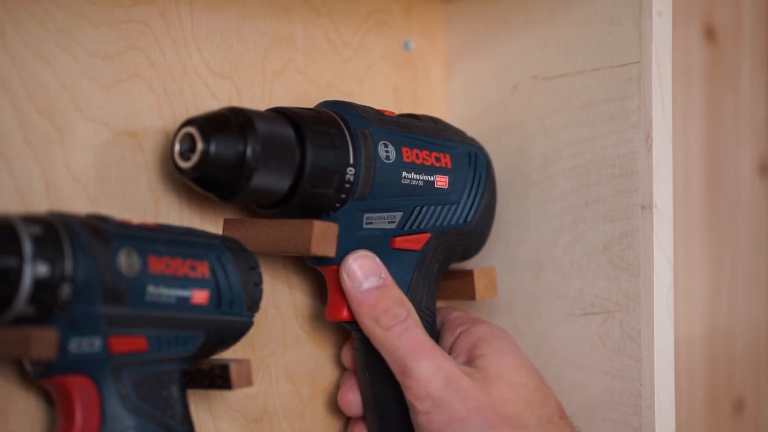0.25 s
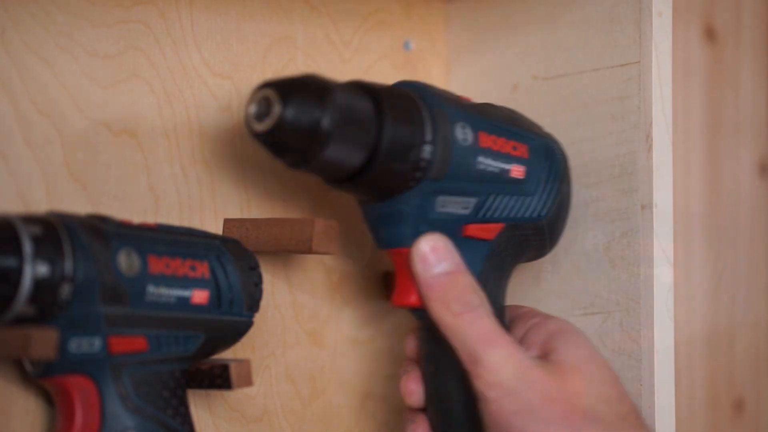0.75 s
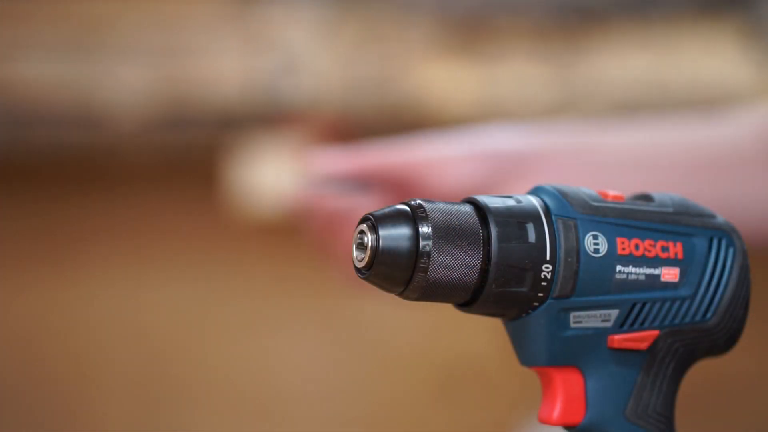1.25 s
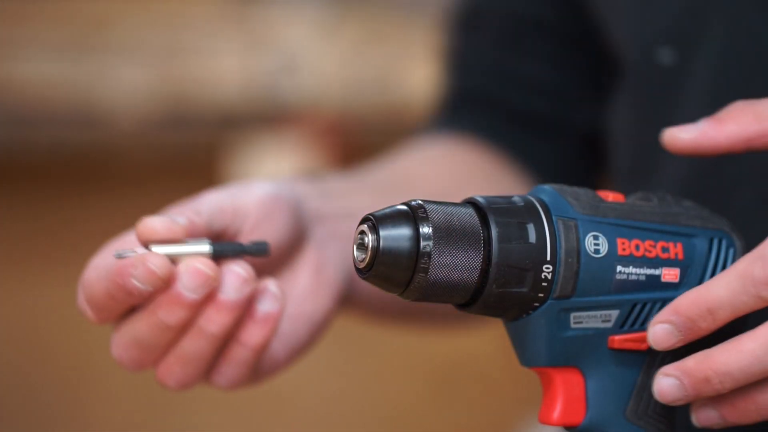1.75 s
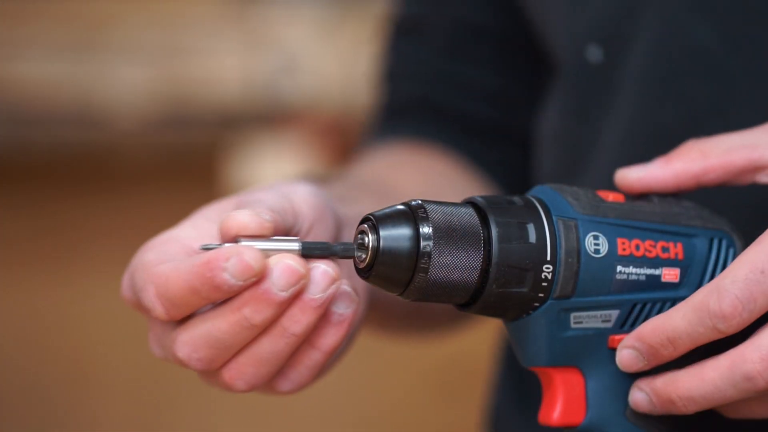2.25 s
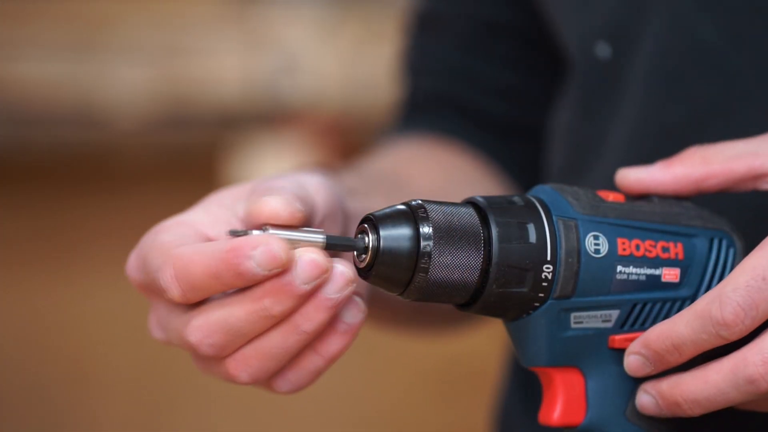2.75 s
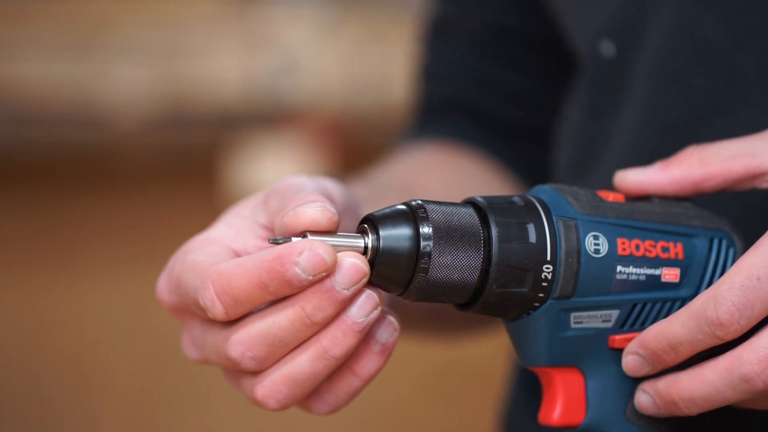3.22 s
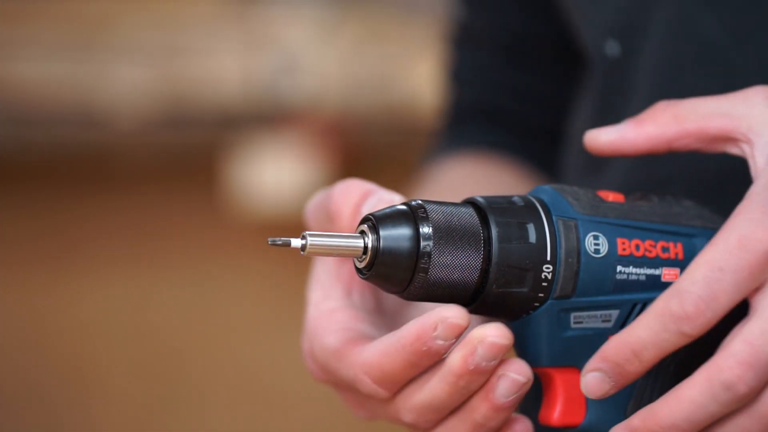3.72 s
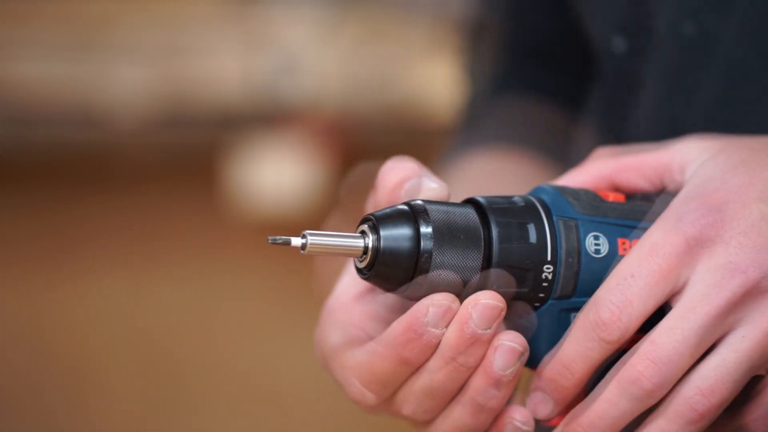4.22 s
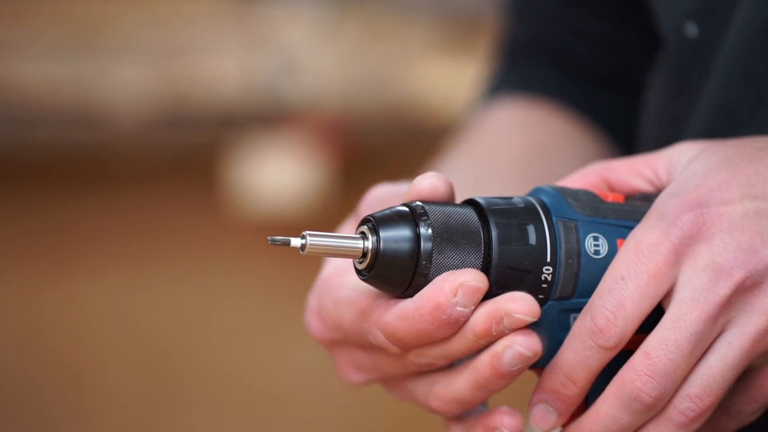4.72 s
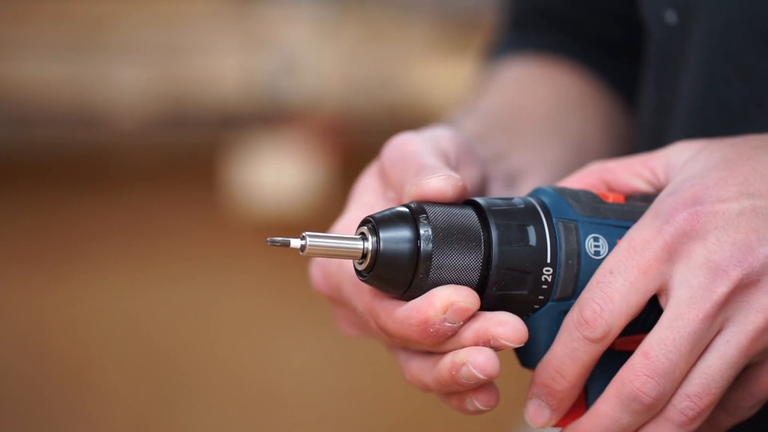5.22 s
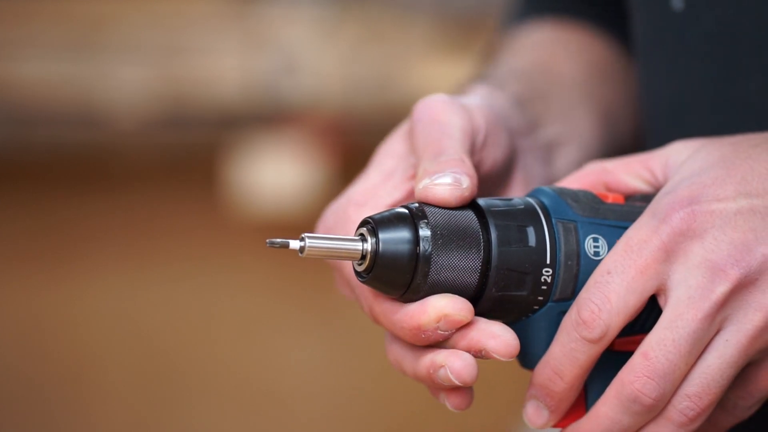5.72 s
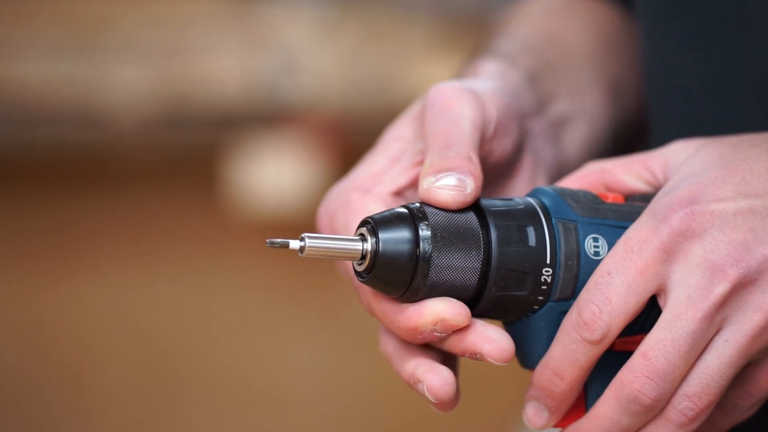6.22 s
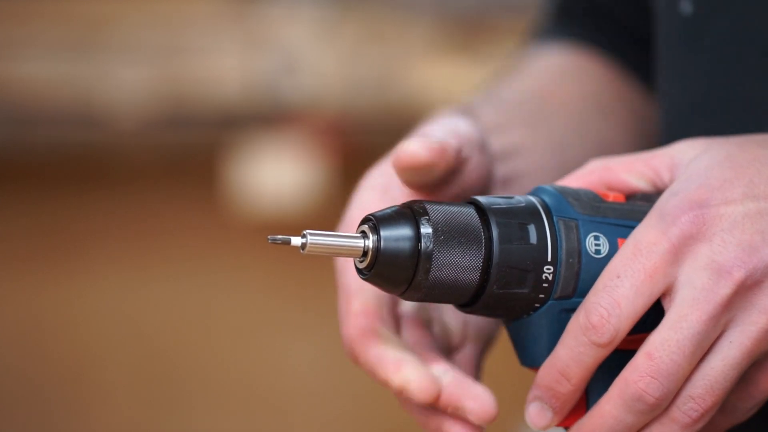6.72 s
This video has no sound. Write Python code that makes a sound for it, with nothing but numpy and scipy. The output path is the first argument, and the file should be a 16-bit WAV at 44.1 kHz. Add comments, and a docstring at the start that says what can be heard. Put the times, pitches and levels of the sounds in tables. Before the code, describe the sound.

A quiet workshop, heard closely, with low uneven rumble, still air and a barely audible, very high steady whine. At 0 s a soft grip tap and rub; around 0.6-0.7 s a drill drags briefly off a wooden rack with a tiny tick. Sleeves swish near 0.8 and 1.0 s. A sole grazes the floor at 1.2 s and lands with a gritty scuff and soft thud at 1.3 s. Cloth swishes again, strongest at 1.9 s. From 2.4 to 3.3 s small bright steel ticks and light rubbing as a bit holder enters the chuck, seating with a dull knock at 3.45 s. Faint touches follow at 4.0-4.5 s. A firm plastic knock at 4.8 s starts the tightening: sharp, ringing ratchet clicks with hollow thumps at 4.9, 5.05, 5.2 and 5.4 s, then a last at 5.95 s, echoing shortly. Tiny ticks at 6.2 s, a soft release tap and rub at 6.8-6.9 s.

```python
"""A drill chuck is tightened through five sharp ratchet clicks: a ringing sleeve, a snap, a clack, a thump.
Before that the drill is dragged off a wooden rack, a steel bit holder ticks on the chuck and is pushed home,
and the spindle lock knocks: filtered cracks over decaying housing modes, echoing in a workshop.
Rubbing, swishing sleeves and a scuffing shoe are shaped noise and tiny slips.
Faint rumble, still air and a steady high whine lie beneath."""
import sys
import numpy as np
from scipy import signal
from scipy.fft import rfft, irfft, next_fast_len
from scipy.io import wavfile
from scipy.ndimage import uniform_filter1d

SR = 44100
rng = np.random.default_rng(int(sys.argv[2]) if len(sys.argv) > 2 else 0)


def to_wav(s):
    """Save 16-bit WAV."""
    ch = np.atleast_2d(s).T  # columns
    pcm = np.round(np.clip(ch, -1, 1) * 32767)  # PCM
    wavfile.write(sys.argv[1], SR, pcm.astype(np.int16))


N = 306934
TIME_S = np.arange(N) / SR

# All levels are relative to the gains in the functions. Every *_COLOUR row: frequency in Hz, level in dB.
# Chuck ratchet clicks. Each row: start in seconds, level in dB, gearbox clack in dB, hollow thump in dB.
RATCHET_CLICKS = [(4.8964, -5.5, -13.5, 9.5), (5.0452, -7, -13.5, 11), (5.2005, -7.5, -14.5, 7.5),
                  (5.4067, -6.5, -20.5, 6), (5.9458, -5, -27, 8.5)]
# Chuck shell resonances. Each row: centre in Hz, width in Hz, lift in dB.
CHUCK_PEAKS = [(1967, 390, 9), (2660, 220, 7), (4870, 996, 5.5), (12840, 3000, 4)]
SLEEVE_HZ = 8780
# Bit holder and fingertips on the chuck. Each row: start in seconds, level in dB,
# ring of the touched spot in Hz, contact cut-off in Hz.
TICKS = [(.017, -42.5, 3840, 6300), (.663, -41.5, 3870, 7140), (2.362, -35, 2420, 11200),
         (2.4007, -33, 4120, 11700), (2.4228, -32.5, 4840, 9200), (2.61, -45, 2730, 4100),
         (2.728, -53, 8000, 12000), (2.8205, -32.5, 6100, 11700), (2.944, -30.5, 4800, 12100),
         (3.0154, -36, 4600, 7800), (3.191, -44, 2630, 4020), (3.2643, -31, 4060, 6270),
         (3.443, -40, 3940, 6860), (3.9941, -48, 2350, 3480), (4.536, -50, 1490, 3970),
         (4.7891, -33, 2900, 6800), (6.162, -40.5, 7800, 13630), (6.188, -44, 4200, 9000),
         (6.818, -46.5, 2485, 5040)]
# Bit holder resonances. Each row: centre in Hz, width in Hz, lift in dB (negative: a dip).
BIT_PEAKS = [(2295, 910, 9), (7800, 870, 6.5), (10200, 4900, -19), (12440, 1200, 6)]
# Firm knocks: drill gripped, bit bumps and seats, spindle locks and rebounds, hand lets go.
# Each row: start in seconds, level in dB, contact cut-off in Hz.
KNOCKS = [(.017, -36.5, 1190), (2.612, -45.5, 890), (3.4446, -22.5, 530), (4.7902, -16.5, 1250),
          (4.8062, -27, 677), (6.819, -37.5, 886)]
# Plastic housing modes. Each row: frequency in Hz, level in dB, t60 in seconds.
HOUSING_MODES = [(296, -25.5, 0.14), (403.3, -18, 0.067), (476, -14, 0.07), (576.8, -12.5, 0.061),
                 (691, -7.5, 0.011), (831, -13, 0.044), (963.6, -11, 0.027), (1263, -5.5, 0.013),
                 (1720, -9.5, 0.0095)]
# Every tick shakes the housing, relative to the tick level; every click jolts it, relative to its thump.
SHAKE_DB, SHAKE_CUT_HZ = -8, 1200
JOLT_DB, JOLT_CUT_HZ = -31, 800
# Drill dragging off its rack. Each row: peak in seconds, level in dB, speeding up and slowing down in seconds.
RACK_DRAGS = [(.604, -48, 0.046, 0.035), (.685, -53, 0.025, 0.023)]
# Spectrum of the drag on wood.
RACK_COLOUR = [(120, -35), (200, -8), (312, -3), (411, -6), (675, -2), (735, 6.5), (787, -3.5), (967, -5),
               (1090, -7), (2200, -17.5), (2480, -20.5), (4150, -18.5), (5360, -31.5), (12000, -39),
               (15600, -68), (22000, -120)]
# Hand and bit rubbing on the drill. Each row: peak in seconds, level in dB,
# speeding up in seconds, slowing down in seconds.
GRIP_RUBS = [(.02, -47.5, 0.034, 0.039), (2.97, -53, .025, 0.055), (3.05, -48, 0.068, 0.041),
             (3.19, -50, 0.053, 0.11), (4.385, -58, 0.017, 0.024), (6.84, -57, 0.055, 0.052),
             (6.92, -53, .02, 0.022)]
# Spectrum of the rubbing.
RUB_COLOUR = [(53, -61), (90, -13.5), (277, -4), (320, -8.5), (629, -9.5), (712, -19), (873, -16.5),
              (1010, -24.5), (2290, -38), (2530, -37.5), (3370, -39.5), (12000, -51), (15600, -78),
              (22000, -120)]
STROKE_POWER = 1.087   # stroke gain follows speed to this power
# Sole grazing the floor, then the shoe landing.
GRAZE_S, GRAZE_DB = 1.188, -42
STEP_S, SCUFF_DB, THUD_DB = 1.286, -34, -33
# Spectra of the graze, of the sole on grit and of the floor thud.
GRAZE_COLOUR = [(150, -5), (400, -5), (900, -17), (1200, 0), (1500, 2), (1800, 4), (2300, -6), (4000, -2.5),
                (7000, -8.5), (10000, -18.5), (16000, -30)]
SCUFF_COLOUR = [(260, -32), (450, 5.5), (936, 1.5), (1040, 9), (1150, 4), (1260, 7), (1630, 5), (4300, 0),
                (8670, -8), (16000, -28)]
THUD_COLOUR = [(30, -24), (55, -4), (90, -2.5), (190, -5.5), (240, -10), (290, -8.5), (390, -8.5),
               (480, -36), (1000, -59)]
# Sleeves brushing. Each row: peak in seconds, swish in dB, low flap in dB,
# speeding up in seconds, slowing down in seconds.
SLEEVE_STROKES = [(.03, -63.5, -69, 0.083, 0.068), (0.784, -55, -58, 0.035, 0.18),
                  (.995, -50, -49, 0.05, 0.069), (1.71, -54, -47, 0.1, 0.07),
                  (1.809, -45.5, -60, 0.055, 0.02), (1.92, -37.5, -45.5, 0.094, 0.057),
                  (3.85, -70.5, -75.5, 0.5, 0.24)]
# Spectra of the cloth's swish and flap.
SWISH_COLOUR = [(260, -20.5), (450, -3), (523, -6.5), (715, -7.5), (759, -1), (818, -5.5), (1810, -3.5),
                (1980, -6), (3050, -7), (8540, -14.5), (10200, -23), (14000, -26.5), (16000, -34.5)]
FLAP_COLOUR = [(60, 14), (110, 4.5), (190, 7), (360, 1.5), (600, -11.5), (1200, -7.5)]
# Workshop echo. Each row: frequency in Hz, level in dB, t60 in seconds.
ROOM_ECHO = [(102.8, 15.5, 0.7), (421, 1.5, 0.33), (983, -3, 0.41), (2496, -3, 0.4), (5120, -2.5, 0.38),
             (7300, 1.5, .34), (8970, -7.5, 0.32), (10300, -2, .28), (12000, -6.5, 0.253),
             (16000, -17.5, 0.3)]
# Bench and near wall. Each row: delay in seconds, level in dB.
REFLECTIONS = [(.0031, -13.5), (.0049, -15), (0.0152, -34.5)]
# Deep room rumble. Each row: time in seconds, level in dB.
RUMBLE_LEVELS = [(0.0, -46.5), (0.06, -40), (0.7, -60), (0.87, -41), (1.63, -34.5), (1.92, -47),
                 (2.02, -33), (2.69, -52), (6.9, -38.5), (6.96, -41)]
# Spectra of the rumble and of the still air.
RUMBLE_COLOUR = [(14, 2), (19, 1), (28, -4), (38, -14.5), (50, -28.5), (70, -23.5), (110, -47.5)]
AIR_COLOUR = [(35, -45), (60, -5), (76, -21), (113, -14), (308, -18.5), (698, -25.5), (862, -26.5),
              (7940, -40.5), (10500, -42), (16000, -44)]
AIR_DB = -66
WHINE_HZ, WHINE_DB = 15625, -87.5
CUTOFF_HZ = 16500


def ratchet(ring_db=-16, ring_t60_s=0.0047, snap_db=3, clack_hz=1150, clack_t60_s=0.014, hollow_db=-3):
    """The pawl snaps over a tooth; the hand-damped sleeve swells within a millisecond and rings briefly."""
    out, t, swell_s = np.zeros(N), TIME_S[:SR // 5], 0.00066
    swell = (t / swell_s * np.exp(1 - t / swell_s)) ** 4
    ring = from_db(ring_db) * burst(t, swell_s, 0, ring_t60_s)
    sleeve = (swell + ring) * np.sin(2 * np.pi * SLEEVE_HZ * t)
    clack_tone = burst(t, swell_s, 0, clack_t60_s) * np.sin(2 * np.pi * clack_hz * t)
    for start_s, db, clack_db, thump_db in RATCHET_CLICKS:
        snap_crack = crack(low_hz=1333, high_hz=16800, t60_s=0.0091)
        snap = from_db(snap_db) * resonate(snap_crack, CHUCK_PEAKS)
        clack = from_db(clack_db) * clack_tone
        # the hollow body answers more slowly, without pitch
        thump = from_db(thump_db + hollow_db) * crack(low_hz=228.2, high_hz=500, t60_s=0.11)
        click = from_db(db) * (sleeve + snap + clack + thump)
        # the hand turns between clicks, so each one meets the room differently
        add(out, start_s, workshop(click))
    return out


def ticks(crack_db=7, spot_db=8, spot_width_hz=450):
    """Light steel contacts, each a crack through the holder's resonances and a spot that pings briefly."""
    out = np.zeros(N)
    for start_s, db, ring_hz, contact_hz in TICKS:
        touch = from_db(db + crack_db) * crack(low_hz=800, high_hz=contact_hz, t60_s=0.022)
        spot = (ring_hz, spot_width_hz, spot_db)
        add(out, start_s, resonate(touch, BIT_PEAKS + [spot]))
    return out


def knocks(crack_db=3):
    """Blows, ticks and clicks excite housing modes and rattling parts; a softer contact passes less treble."""
    out = np.zeros(N)
    modes = struck(HOUSING_MODES)
    shakes = [(s, db + SHAKE_DB, SHAKE_CUT_HZ) for s, db, _, _ in TICKS]
    jolts = [(s, db + thump_db + JOLT_DB, JOLT_CUT_HZ) for s, db, _, thump_db in RATCHET_CLICKS]
    for start_s, db, contact_hz in KNOCKS + shakes + jolts:
        contact = signal.butter(2, contact_hz, fs=SR, output="sos")
        rattle = from_db(crack_db) * crack(low_hz=278.6, high_hz=6130, t60_s=0.03)
        add(out, start_s, from_db(db) * signal.sosfilt(contact, modes + rattle))
    return out


def rubbing(rack_db=-1, grip_db=-1):
    """Friction as the drill drags off its rack, the bit slides into the jaws and the grip shifts."""
    rack = strokes(RACK_DRAGS) * friction(RACK_COLOUR, slips_per_s=500, spread_db=0, smooth=1.0)
    grip = strokes(GRIP_RUBS) * friction(RUB_COLOUR, slips_per_s=360, spread_db=4.0, smooth=0.98)
    return from_db(rack_db) * rack + from_db(grip_db) * grip


def footstep():
    """The sole grazes, then the floor thuds while the sole grinds on grit; all die away."""
    graze = friction(GRAZE_COLOUR, slips_per_s=7000, spread_db=-5, smooth=0.97)
    graze *= burst(TIME_S - GRAZE_S, rise_s=0.0044, hold_s=0.025, t60_s=0.35)
    scuff = friction(SCUFF_COLOUR, slips_per_s=4600, spread_db=-3.0, smooth=0.62)
    scuff *= burst(TIME_S - STEP_S, rise_s=0.018, hold_s=0.051, t60_s=0.48)
    thud = coloured(rng.standard_normal(N), THUD_COLOUR)
    thud *= burst(TIME_S - STEP_S, rise_s=0.0086, hold_s=0.044, t60_s=0.38)
    return from_db(GRAZE_DB) * graze + from_db(SCUFF_DB) * scuff + from_db(THUD_DB) * thud


def brushing(swish_db=0.0, flap_db=-2.0):
    """Each arm movement makes the cloth swish with many slips and, lower down, flap."""
    swish_gain = strokes([(s, db + swish_db, rise, fall) for s, db, _, rise, fall in SLEEVE_STROKES])
    flap_gain = strokes([(s, db + flap_db, rise, fall) for s, _, db, rise, fall in SLEEVE_STROKES])
    swish = swish_gain * friction(SWISH_COLOUR, slips_per_s=3300, spread_db=-2.0, smooth=1.54)
    flap = flap_gain * coloured(rng.standard_normal(N), FLAP_COLOUR)
    return swish + flap


def workshop(x, build_s=0.0004):
    """Direct sound, a few near reflections and a diffuse noise tail with its own decay in each band."""
    t = TIME_S[:SR * 2 // 3]
    hz = np.fft.rfftfreq(len(t), 1 / SR)
    white = rfft(rng.standard_normal(len(t)))
    centres_hz = np.linspace(10, 127, 30) ** 2
    response = np.zeros(len(t))
    # overlapping triangular bands that sum to one
    for centre_hz, share in zip(centres_hz, np.eye(len(centres_hz))):
        band = irfft(white * at_hz(np.c_[centres_hz, share], hz), len(t))
        envelope = burst(t, build_s, 0, at_hz(ROOM_ECHO, centre_hz, axis=2))
        response += from_db(at_hz(ROOM_ECHO, centre_hz)) * band * envelope / np.linalg.norm(envelope)
    for delay_s, db in REFLECTIONS:
        response[round(delay_s * SR)] += from_db(db)
    response[0] += 1   # direct sound
    return signal.fftconvolve(x, response)[:N]


def background():
    """Rumble and still air are coloured noise; a faint electronic whine is a sine."""
    deep = coloured(rng.standard_normal(N), RUMBLE_COLOUR)
    # even out the noise before applying the level curve
    deep = deep / np.sqrt(uniform_filter1d(deep ** 2, size=14000))
    rumble = from_db(np.interp(TIME_S, *np.transpose(RUMBLE_LEVELS))) * deep
    air = from_db(AIR_DB) * coloured(rng.standard_normal(N), AIR_COLOUR)
    whine = from_db(WHINE_DB) * np.sqrt(2) * np.sin(2 * np.pi * WHINE_HZ * TIME_S)
    return rumble + air + whine


def crack(low_hz, high_hz, t60_s):
    """Two surfaces crunch: a click smeared by the phase of decaying noise, near-even in spectrum, band-passed."""
    t = TIME_S[:SR // 5]
    phase = np.angle(rfft(rng.standard_normal(len(t)) * decay(t, t60_s)))
    click = irfft(np.exp(1j * phase), len(t)) * (t < t60_s)
    band = signal.butter(2, [low_hz, high_hz], "band", fs=SR, output="sos")
    return signal.sosfilt(band, click)


def resonate(x, peaks):
    """Pass a sound through broad resonances in series."""
    for hz, width_hz, lift_db in peaks:
        b, a = signal.iirpeak(hz, hz / width_hz, fs=SR)
        x = x + (from_db(lift_db) - 1) * signal.lfilter(b, a, x)
    return x


def struck(modes):
    """One blow: decaying sines of alternating sign."""
    hz, db, t60_s = np.array(modes).T[:, :, None]
    t = TIME_S[:SR // 5]
    signs = (-1) ** np.arange(len(hz))[:, None]
    return np.sum(signs * from_db(db) * decay(t, t60_s) * np.sin(2 * np.pi * hz * t), axis=0)


def friction(spectrum, slips_per_s, spread_db, smooth):
    """Random tiny slips of either sign, of uneven size unless the spread is zero, over a smooth hiss."""
    sizes = from_db(spread_db * np.minimum(rng.exponential(1, N), 4))
    signs = rng.choice([-1, 1], N)
    slips = sizes * signs * (rng.random(N) < slips_per_s / SR)
    return coloured(rms_one(slips) + smooth * rng.standard_normal(N), spectrum)


def strokes(rows):
    """Gain of sliding strokes: each speeds up and slows as a bell; their powers add."""
    power = 0
    for peak_s, db, rise_s, fall_s in rows:
        width_s = np.where(TIME_S < peak_s, rise_s, fall_s)   # time from peak to half speed
        speed = 1 / (1 + ((TIME_S - peak_s) / width_s) ** 2)
        power = power + (from_db(db) * speed ** STROKE_POWER) ** 2
    return np.sqrt(power)


def decay(age_s, t60_s):
    """Exponential decay that falls 60 dB in t60."""
    return np.exp(-np.log(1000) * age_s / t60_s)


def burst(age_s, rise_s, hold_s, t60_s):
    """Envelope with a linear rise and a decay that starts at the hold time, counted from onset."""
    return np.clip(age_s / rise_s, 0, 1) * decay(np.maximum(age_s - hold_s, 0), t60_s)


def coloured(x, spectrum):
    """Give a signal a spectrum that falls steeply beyond its ends; rms 1."""
    size = next_fast_len(N)
    hz = np.fft.rfftfreq(size, 1 / SR) + 1   # offset avoids 0 Hz
    low_hz, high_hz = spectrum[0][0], spectrum[-1][0]
    ends = np.minimum(1, np.minimum(hz / low_hz, high_hz / hz)) ** 4
    shaped = rfft(x, size) * from_db(at_hz(spectrum, hz)) * ends
    return rms_one(irfft(shaped, size)[:N])


def at_hz(points, hz, axis=1):
    """Read a column of a spectrum table on a log-frequency axis."""
    points = np.array(points)
    return np.interp(np.log(np.maximum(hz, 1)), np.log(points[:, 0]), points[:, axis])


def rms_one(x):
    """Scale to unit rms."""
    return x / np.sqrt(np.mean(x ** 2) + 1e-20)


def from_db(db):
    """Decibels to gain."""
    return 10 ** (np.asarray(db) / 20)


def add(track, start_s, sound):
    """Mix a sound in at a time, cut at the track's end."""
    start = max(round(start_s * SR), 0)
    track[start:start + len(sound)] += sound[:N - start]


def scene():
    """Clicks, ticks and knocks echo in the workshop over the softer handling sounds."""
    drill = ratchet() + workshop(ticks() + knocks())
    return (drill + rubbing() + footstep() + brushing() + background())[None]


def record(dry):
    """A steep low-pass cuts the top."""
    return signal.sosfilt(signal.ellip(10, 0.1, 80, CUTOFF_HZ, fs=SR, output="sos"), dry)


dry = scene()
out = record(dry)
to_wav(out)
```